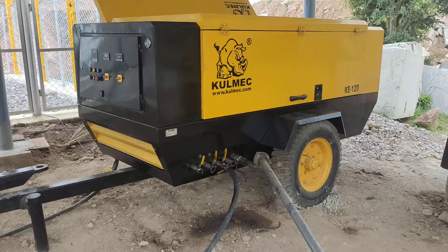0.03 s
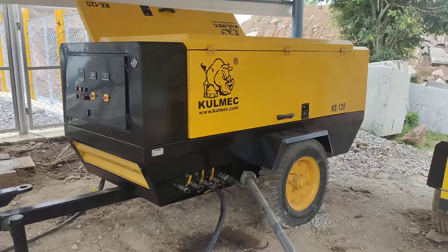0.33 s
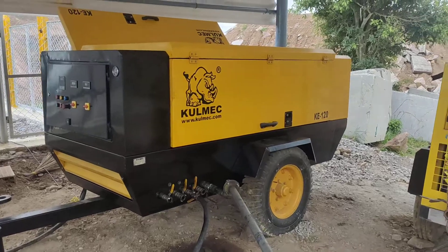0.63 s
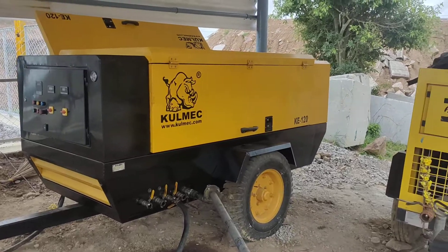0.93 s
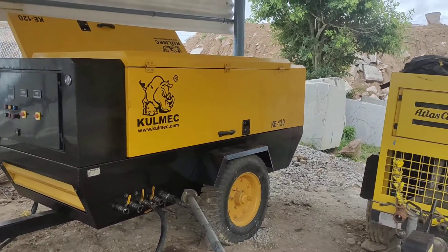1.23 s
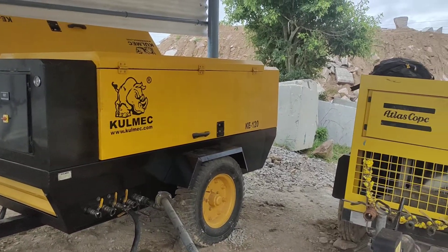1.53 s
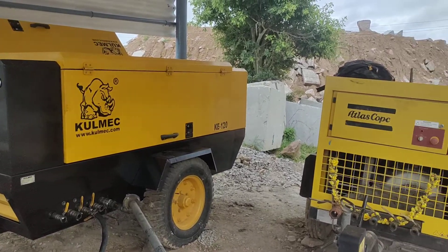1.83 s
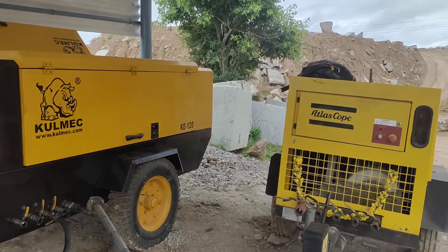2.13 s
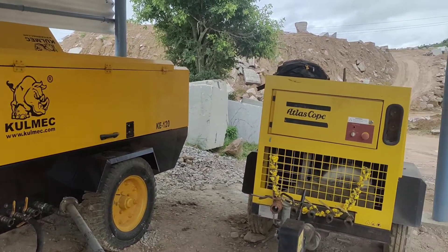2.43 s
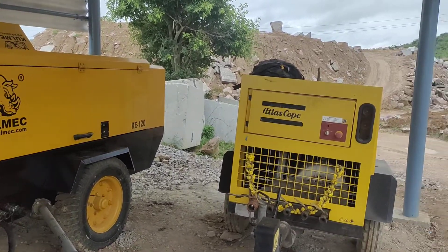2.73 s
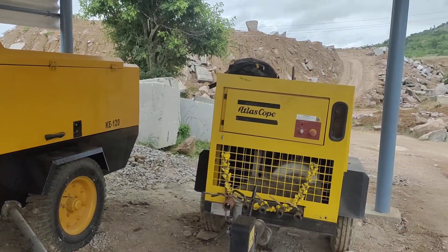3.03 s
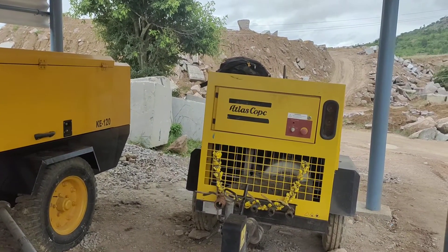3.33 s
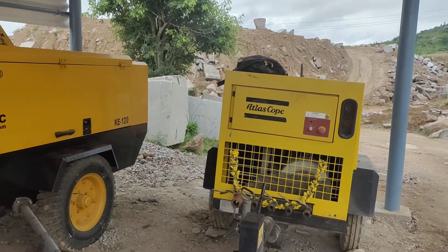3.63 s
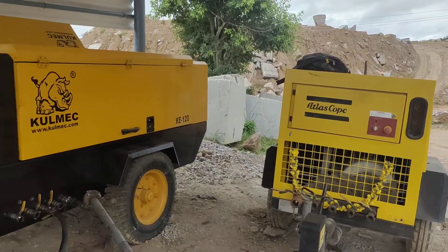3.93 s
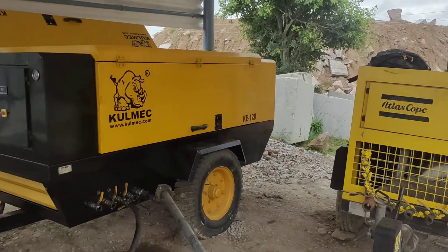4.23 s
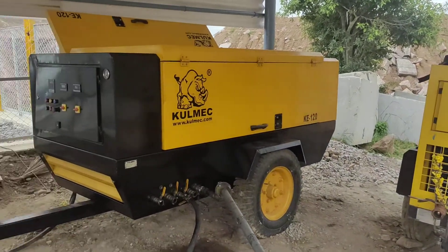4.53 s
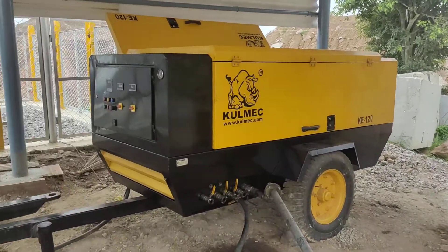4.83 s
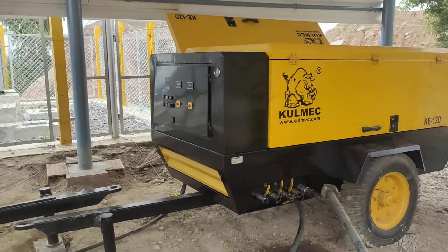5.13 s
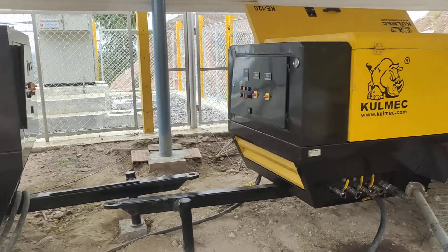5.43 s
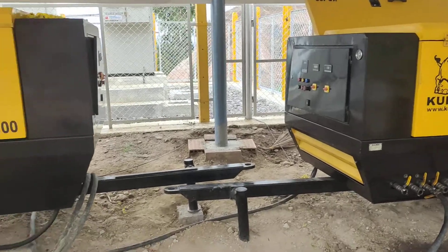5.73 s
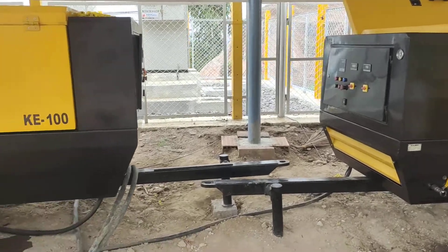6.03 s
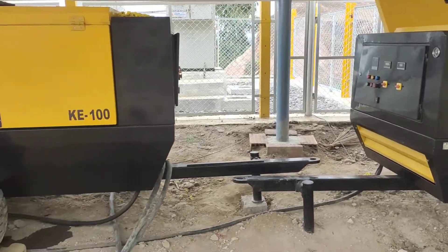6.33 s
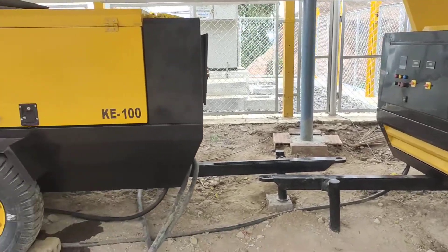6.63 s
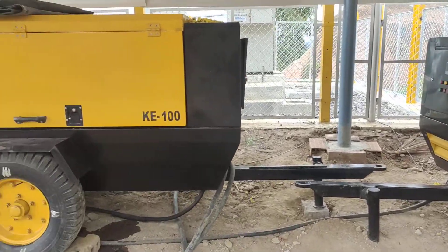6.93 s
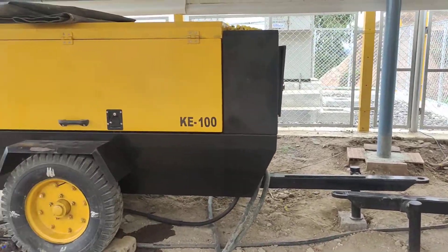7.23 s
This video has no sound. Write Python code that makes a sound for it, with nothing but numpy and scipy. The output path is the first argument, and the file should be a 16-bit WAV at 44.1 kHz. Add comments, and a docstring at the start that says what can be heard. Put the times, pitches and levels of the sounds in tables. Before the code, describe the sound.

At about 0.3 seconds a loud machine drone swells in quickly and holds to the end, around 7.5 seconds. A diesel air compressor runs at a steady speed a few metres away under an open shelter, its low engine hum topped by a strong mid-pitched fan note and its octave. A second machine drones more quietly, about a fourth lower. Cooling air roars and hisses through the housings, pulsing lightly with the diesel clatter. The microphone turns slowly right until about 2 seconds, then swings left between 4 and 6 seconds, so the sound drifts across the ears and the hum gently rises and dips. The second machine's overtones flare briefly near 1 and 2.5 seconds. One sharp tick with a soft thud comes at about 5.4 seconds. Around 7 seconds a higher whine grows slightly as the drone carries on.

```python
"""A diesel air compressor runs at a steady speed under an open shelter, a few metres away.
Its engine hums and drives a seven-blade fan, which chops the air into a strong note. A second machine
drones about a fourth lower. Cooling air roars through the housings, pulsing with the diesel clatter.
The listener slowly turns from side to side, and one sharp tick is heard."""
import sys
import numpy as np
from scipy import signal
from scipy.fft import rfft, irfft
from scipy.io import wavfile
from scipy.ndimage import map_coordinates

SR = 44100
rng = np.random.default_rng(int(sys.argv[2]) if len(sys.argv) > 2 else 0)


def to_wav(sig):
    """Store sig (one row per channel, or 1-D mono) as 16-bit WAV at the path in sys.argv[1].

    Samples outside -1..1 are clipped; the rate is SR.
    """
    pcm = np.clip(np.atleast_2d(sig), -1, 1) * 32767
    pcm = np.round(pcm).astype(np.int16)
    wavfile.write(sys.argv[1], SR, pcm.T)  # frames by channels


N = 330750
TIME = np.arange(N) / SR
HZ = np.fft.rfftfreq(N, 1 / SR)

# Where the listener faces, right is positive: t/s, angle/degrees
HEADING = [(0.3, 9), (1.2, 18), (2.2, 37), (3.3, 30), (4.15, 17), (4.8, 0), (5.8, -52), (7.4, -55)]
# Delay of the left ear, of which each layer takes a share: t/s, delay/ms
LEFT_DELAY = [(0.3, .39), (3, 0.44), (4.6, 0.33), (5.2, 0.027), (6, -0.094), (7.4, -0.2)]
# The listener moves through loud and quiet spots (standing waves) of the hum: t/s, gain/dB
HUM_GAIN = [(0.4, -3.5), (0.85, -0.5), (1.5, -3), (2.2, -2.5), (3.2, -4), (4.1, -3), (5, -1.1), (5.8, -3),
            (6.5, 0.5), (7.4, -1.5)]
# The second machine's fan note: t/s, level/dB
FAR_NOTE = [(0.45, -18.5), (0.76, -16), (1.12, -21.3), (1.46, -17.5), (1.85, -22), (3.2, -21.5),
            (4.2, -19.5), (5.1, -19.5), (6.7, -20.5), (7.5, -18)]
# Spots where its overtones flare up: t/s, half length/s, 2nd harmonic gain/dB, 3rd harmonic gain/dB
FAR_FLARES = [(1.02, .32, 4, 10), (2.55, .22, 4, 1), (7.17, 0.22, 9, 11)]
# The cooling air before the housings colour it: f/Hz, level/dB per Hz
AIR_SPECTRUM = [(20, -77), (60, -75), (95, -58.5), (130, -55), (210, -52.5), (290, -48.5), (420, -52),
                (760, -50.5), (900, -46), (1150, -49.5), (1800, -51), (3000, -57.5), (5700, -70.5),
                (15000, -85)]
# How alike the air sounds in both ears: f/Hz, likeness (0 to 1)
EAR_LIKENESS = [(40, 1), (200, 0.94), (400, 0.98), (700, 0.55), (1100, 0.16), (2200, 0.1), (4000, 0.031),
                (15000, 0.044)]
# Beams of thin hiss, left then right: heading/degrees, half width/degrees, base gain/dB, boost/dB
SIZZLE_BEAMS = [(17, 9, 1, 3.6), (36, 32, -3, 4)]
# The near engine's tones: multiple of shaft speed, level/dB before HUM_GAIN
ENGINE_TONES = [(1, -56), (2, -40), (3, -28.5), (4, -35), (5, -36), (6, -25.5), (8, -41), (9, -36),
                (11, -43), (15, -40), (20, -42)]
# The near fan's high overtones: multiple of its note, level/dB
FAN_OVERTONES = [(4, -39), (5, -65), (6, -42)]
# Resonances of the left and right microphone openings: f/Hz, width/Hz, gain/dB
LEFT_PORT = [(3130, 3600, 2), (6680, 1400, 5), (10000, 3300, 3), (13160, 760, 9), (13850, 1300, 9.5)]
RIGHT_PORT = [(3200, 2400, -1.85), (7450, 1830, 7.5), (8900, 2450, 6.5), (14000, 1000, 6)]
# The sound swells in at the start: t/s, gain/dB
FADE_IN = [(0.266, -100), (0.268, -15), (0.33, -5), (0.41, -0.5), (0.5, -0.5)]

SHAFT_HZ, BLADES = 48.52, 7  # the near machine
FAR_FAN_HZ, AIR_PUMP_HZ = 249.35, 408  # the second machine
# Resonances of the housings, each f/Hz, width/Hz
ROAR, KNOCK, FIZZ, SIZZLE = (1050, 600), (2130, 800), (7900, 3900), (13900, 2000)


def gain_of(db):
    """Turns decibels into a factor to multiply by."""
    return 10 ** (np.asarray(db) / 20)


def unit_level(x):
    """Scales a signal to an average (rms) level of one."""
    return x / np.sqrt(np.mean(x ** 2) + 1e-20)


def over_time(table):
    """The value of a time table at every sample."""
    return np.interp(TIME, *np.transpose(table))


def over_frequency(table):
    """The value of a frequency table at every frequency, on a log scale."""
    hz, value = np.transpose(table)
    return np.interp(np.log(HZ + 1), np.log(hz + 1), value)


def wander(rate_hz):
    """A smooth random wobble of size one, up to about the given rate."""
    return unit_level(irfft(rfft(rng.standard_normal(N)) / (1 + (HZ / rate_hz) ** 4), N))


def bell(hz, width):
    """The shape of a resonance over frequency, one at its top."""
    return 1 / (1 + (2 * (HZ - hz) / width) ** 2) ** 2


def spot(at_s, half_s):
    """Rises softly to one and falls again as the listener passes a spot."""
    return np.exp(-((TIME - at_s) / half_s) ** 4)


def lean_left(x, db):
    """Makes two channels, the left louder than the right by db."""
    return x * gain_of(np.outer([.5, -.5], db))


def delay_left(x, share):
    """Sound reaches the left ear later, or earlier when the delay is negative."""
    delay_s = share * over_time(LEFT_DELAY) / 1000
    return map_coordinates(x, [(TIME - delay_s) * SR], order=3, mode="nearest")


def count_turns(hz, wobble):
    """Cycles made so far, as the engine's governor holds the speed almost steady."""
    return np.cumsum(hz * (1 + wobble * wander(1.7))) / SR


def tone(turns, db, waver):
    """A pure tone whose strength and phase waver as swirling air flows in."""
    flutter = 1 + waver * (wander(14) + 1j * wander(23))
    wave = np.exp(2j * np.pi * (turns + rng.random()))
    return np.sqrt(2) * gain_of(db) * (flutter * wave).real


def tick(at_s=5.4233, db=-13, decay_s=.0015):
    """A brief click that dies away: a sharp tick with a soft thud."""
    return gain_of(db) * (TIME >= at_s) * np.exp(-np.maximum(TIME - at_s, 0) / decay_s)


def shelter_echoes(x, echo_db, drift_s, count=6):
    """Sound bounces off ground, roof and panels; the paths drift as the listener moves."""
    mix = x.copy()
    for delay_s in rng.uniform(.003, .03, count):
        source_time = TIME - delay_s - drift_s * wander(.4)
        samples = np.clip(np.round(source_time * SR).astype(int), 0, N - 1)
        mix += gain_of(echo_db) * x[:, samples]
    return mix / np.sqrt(1 + count * gain_of(echo_db) ** 2)


def far_machine():
    """The second machine's fan beats against the near engine's hum; an air pump hums beside it."""
    flares_db = sum(np.outer(db, spot(at_s, half_s)) for at_s, half_s, *db in FAR_FLARES)
    second_db, third_db = 1.05 * over_time(HUM_GAIN) + flares_db
    turns = count_turns(FAR_FAN_HZ, wobble=.00069)
    note = tone(turns, over_time(FAR_NOTE), waver=.1)
    note = lean_left(note, db=-.4 - .02 * over_time(HEADING))
    second = tone(2 * turns, db=-31.3 + second_db, waver=.14)
    third = tone(3 * turns, db=-36 + third_db, waver=.3)
    pump = tone(AIR_PUMP_HZ * TIME, db=-36, waver=.089)
    return note + second + third + pump


def diesel_clatter(shaft, depth=.11, uneven_db=5.2, decay_share=.4):
    """A pulsing gain: the engine fires twice a turn, each burst with its own strength."""
    firings = 2 * shaft
    strength = gain_of(uneven_db * rng.standard_normal(2000))[firings.astype(int)]
    burst = np.exp(-(firings % 1) / decay_share)
    return unit_level(1 + depth * strength * burst)


def cooling_air(shaft, gust_hz=2.6):
    """Swirling air rushes and pulses with the firings; only its low part is alike in both ears."""
    pulses = diesel_clatter(shaft)
    swirl = gain_of(.5 * wander(8.6) + .5 * wander(250))
    left, other = rfft(rng.standard_normal((2, N)) * pulses * swirl)
    likeness = np.clip(over_frequency(EAR_LIKENESS), 0, 1)
    right = likeness * left + np.sqrt(1 - likeness ** 2) * other
    spectra = np.array([left, right]) * gain_of(over_frequency(AIR_SPECTRUM)) * np.sqrt(SR / 2)
    lows = 1 / (1 + (HZ / 900) ** 4)
    boom = irfft(spectra * lows, N) * gain_of(2 + .2 * over_time(HUM_GAIN) + .5 * wander(gust_hz))
    hiss_db = -.43 + .0034 * over_time(HEADING) + .36 * wander(gust_hz)
    hiss = irfft(spectra * (1 - lows), N) * gain_of(hiss_db)
    return boom + hiss


def housings(air):
    """Each opening beams out its own resonance, louder when it faces the listener."""
    heading = over_time(HEADING)
    roar = gain_of(-.1 + .74 * over_time(HUM_GAIN))
    knock = gain_of(1.03 + .0273 * heading)
    fizz = lean_left(gain_of(2 * spot(at_s=.74, half_s=.27)), db=-.04 * heading)
    sizzle = gain_of([base_db + boost_db * np.exp(-((heading - centre) / half_width) ** 2)
                      for centre, half_width, base_db, boost_db in SIZZLE_BEAMS])
    bands = [(ROAR, roar), (KNOCK, knock), (FIZZ, fizz), (SIZZLE, sizzle)]
    spectrum = rfft(air)
    return air + sum((gain - 1) * irfft(spectrum * bell(*band), N) for band, gain in bands)


def near_engine(shaft):
    """The exhaust and engine block hum at whole multiples of the shaft speed."""
    hum_db = over_time(HUM_GAIN)
    return sum(tone(round(k) * shaft, db + hum_db, waver=.096) for k, db in ENGINE_TONES)


def near_fan(shaft, drift_db=.23, drift_hz=1.5):
    """Blades chop the cooling air into a strong note, its octave and faint overtones."""
    passes = BLADES * shaft
    note = tone(passes, db=-15 + drift_db * wander(drift_hz), waver=.054)
    octave = tone(2 * passes, db=-19 + drift_db * wander(drift_hz), waver=.07)
    # The listener crosses a quiet spot of the octave, deeper in the left ear.
    dip = gain_of(np.outer([-5.5, -1], spot(at_s=7, half_s=.8)))
    whine_db = -35 + 1.3 * over_time(HUM_GAIN) + 5.3 * spot(at_s=7.1, half_s=.8)
    whine = tone(3 * passes, whine_db, waver=.17)
    overtones = sum(tone(round(k) * passes, db, waver=.2) for k, db in FAN_OVERTONES)
    return lean_left(note, db=.9) + octave * dip + whine + overtones


def scene():
    """Mixes drone, air and tick; the drone fills the shelter, so its direction is vaguer."""
    shaft = count_turns(SHAFT_HZ, wobble=.00053)
    drone_left, drone_right = near_fan(shaft) + near_engine(shaft) + far_machine()
    air = housings(cooling_air(shaft))
    air_left, air_right = shelter_echoes(air, echo_db=-20, drift_s=.00015)
    left = delay_left(drone_left, share=.38) + delay_left(air_left, share=.98)
    return np.array([left, drone_right + air_right]) + tick()


def record(dry):
    """The microphone openings colour each side; the sound swells in and loses its highest treble."""
    ports_db = [sum(db * bell(hz, width) for hz, width, db in port) for port in (LEFT_PORT, RIGHT_PORT)]
    x = irfft(rfft(dry) * gain_of(ports_db), N)
    x *= gain_of(over_time(FADE_IN)) * (TIME > FADE_IN[0][0])
    x = x / (1 + (abs(x) / .98) ** 8) ** (1 / 8)  # rounds off the peaks
    treble_cut = signal.firwin(401, cutoff=15050, window=("kaiser", 9), fs=SR)
    return signal.oaconvolve(x, treble_cut[None], "same")


dry = scene()
out = record(dry)
to_wav(out)
```